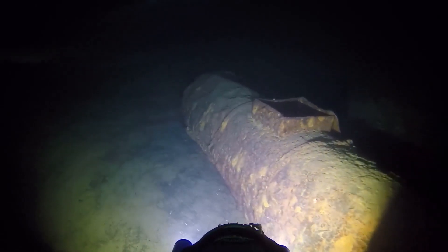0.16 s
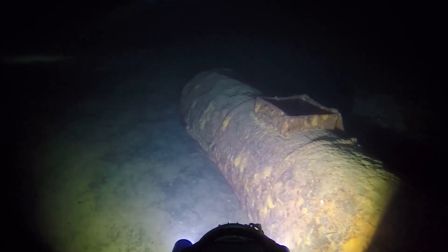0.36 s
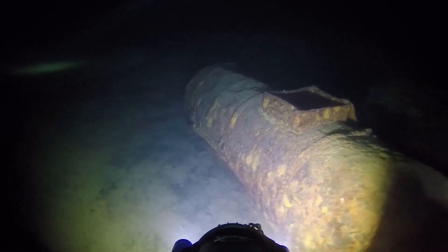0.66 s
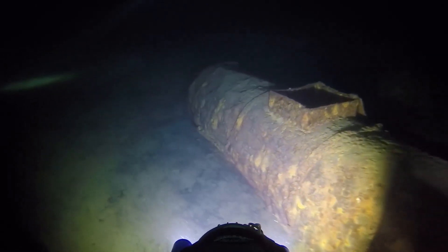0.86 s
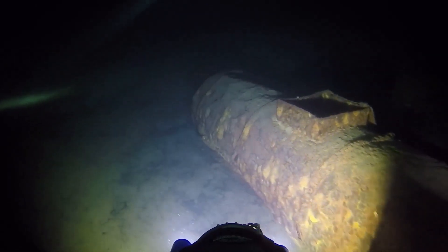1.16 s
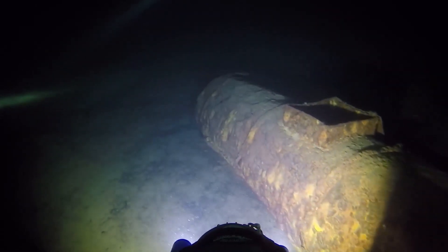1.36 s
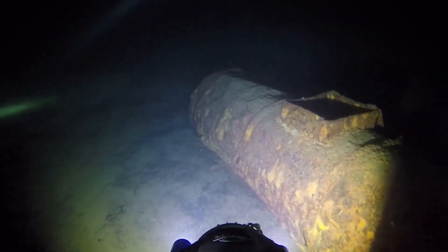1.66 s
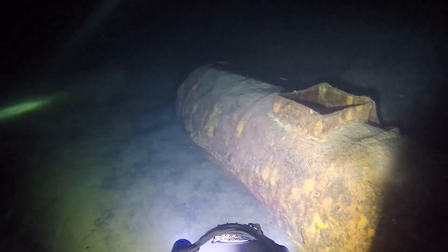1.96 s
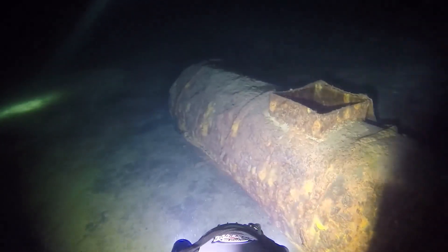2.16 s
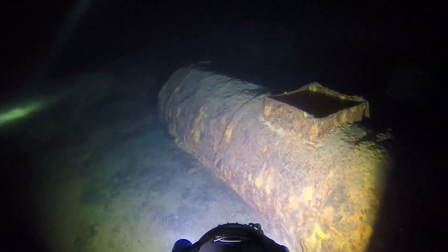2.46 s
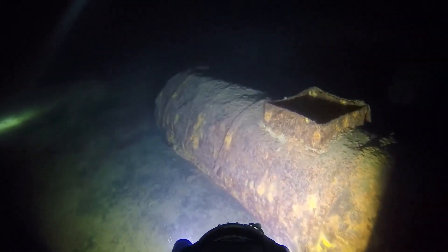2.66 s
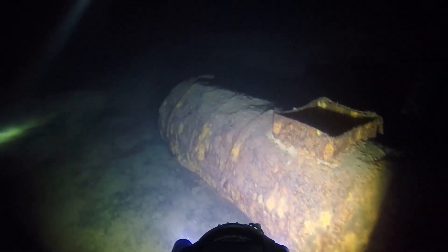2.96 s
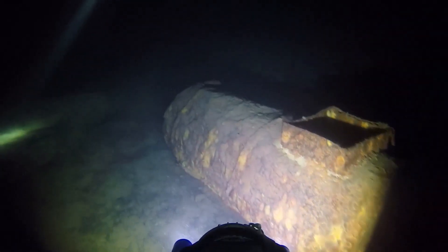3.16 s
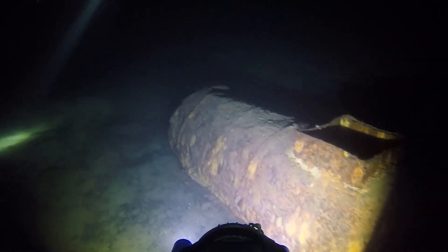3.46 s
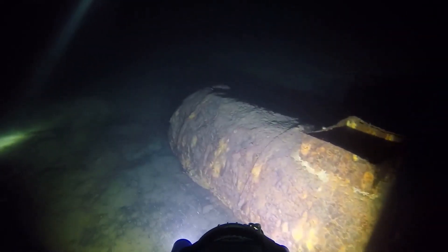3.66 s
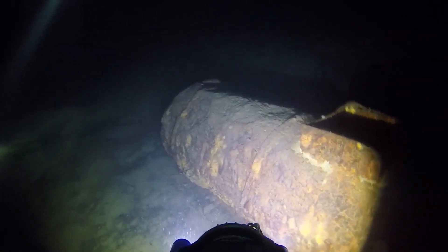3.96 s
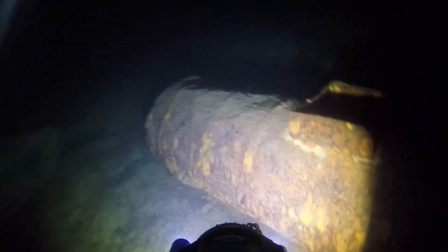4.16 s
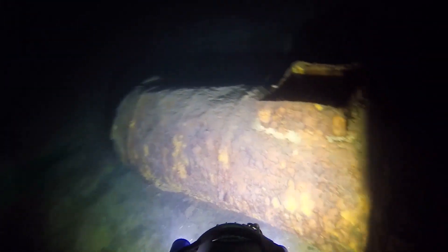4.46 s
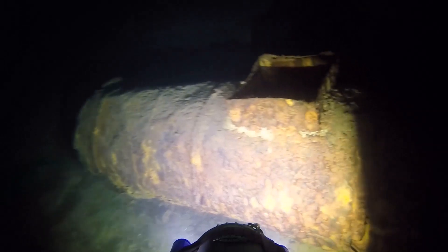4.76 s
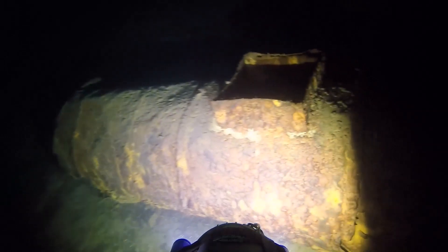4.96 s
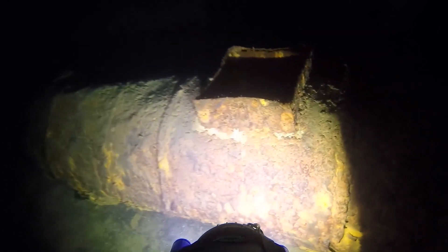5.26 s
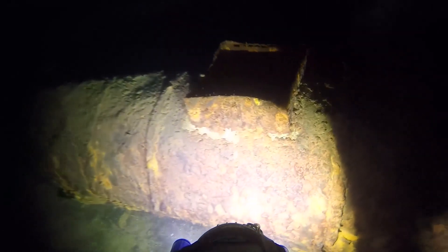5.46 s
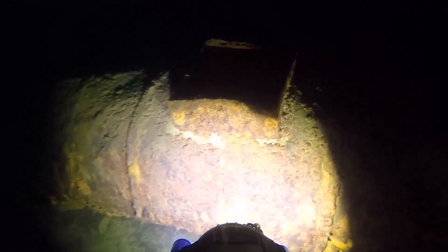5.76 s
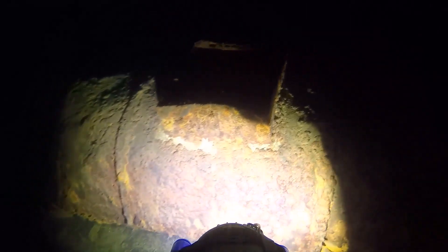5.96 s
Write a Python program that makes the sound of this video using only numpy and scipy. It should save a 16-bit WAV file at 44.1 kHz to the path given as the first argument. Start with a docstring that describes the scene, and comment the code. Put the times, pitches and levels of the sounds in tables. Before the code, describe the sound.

The sound is close, dry and enclosed, from one microphone inside a watertight housing underwater. Quiet constant hiss and very deep flow continue throughout, with a barely perceptible high whine fading after 2 s. Tiny ticks appear around 0.6-0.8 s, with a clearer crisp pair near 1.0 s. A faint rub swells around 1.4-1.5 s with a tick and a trace of sizzle; more ticks follow at 1.7 and 2.2 s, then two soft dull bumps at 2.3 s. At 2.88 s a very loud, hard knock cracks and rings briefly, with small bounces. From 3.17 to 3.4 s muffled knocks tumble over scraping, gritty grinding and low rumble. A tick comes at 3.7 s, a dull thud at 4.04 s, another tick at 4.12 s, then thin sizzle from 4.3 s. Short scrapes at 4.6-4.8 s lead to stronger rumbling rubs at 5.2-5.5 s, fading past small creaks at 5.6 and 5.8 s.

```python
"""Blows on the rig of a watertight camera housing in dark, still water: a sharp knock, softer ones and bounces.
Each rings the housing's modes, adds a noise crack and leaves a shudder; dull bumps are decaying sines.
A rubbing grip drives the same modes with random slips: scrape and rumble, with gritty grinding under two strokes.
Over it: modal ticks on the shell, creaks of the mount and grainy sizzles.
Behind it: filtered-noise flow rumble and hiss, and a faint whine of steady sines that fades."""
import sys
import numpy as np
from scipy import signal
from scipy.fft import rfft, irfft, next_fast_len
from scipy.io import wavfile
from scipy.ndimage import uniform_filter1d

SR = 44100
rng = np.random.default_rng(int(sys.argv[2]) if len(sys.argv) > 2 else 0)


def log_audio(samples):
    """Write samples as a 16-bit WAV file to the path given in sys.argv[1]."""
    # one column per channel
    frames = np.atleast_2d(samples).T
    # limit to full scale, then quantise
    limited = np.clip(frames, -1, 1)
    pcm = np.round(limited * 32767).astype(np.int16)
    wavfile.write(sys.argv[1], SR, pcm)


N = 269886
TIME_S = np.arange(N) / SR

# modes of housing and rig: [f/Hz, relative level/dB, t60/s]
HOUSING_MODES = [(34.4, -36.5, 0.43), (49.93, -18, 0.036), (74.7, -34.5, 0.4), (93.8, -20.5, 0.155),
                 (108.1, -32, 0.38), (127.1, -31, 0.23), (142.3, -28.5, 0.25), (185.5, -37, 0.34),
                 (264, -33.5, 0.24), (327.4, -32, 0.19), (379, -39, 0.2), (408, -38.5, 0.3),
                 (567, -28, 0.082), (643.8, -29, 0.21), (673, -28.5, 0.17), (757.4, -28.5, 0.18),
                 (772, -27.5, 0.12), (800, -21, 0.11), (849, -39, 0.27), (875, -14.5, 0.031),
                 (936, -22, 0.075), (957, -7, 0.014), (1047, -31, 0.11), (1134, -38.5, 0.16),
                 (1180, -33, 0.08), (1270, -24, 0.062), (1382, -35, 0.083), (1458, -26, 0.044),
                 (1481, -29, 0.018), (1612, -35.5, 0.061), (1707, -43, 0.053), (1895, -36, 0.045),
                 (2145, -32.5, 0.05), (2600, -29, 0.027), (2758, -27, 0.022), (2820, -31.5, 0.028),
                 (3200, -39, 0.03), (3630, -41.5, 0.022), (3840, -38, 0.025), (4570, -43.5, 0.025)]
# anti-resonances of the housing: [f/Hz, Q/1]
HOUSING_NOTCHES = [(218, 59), (475, 2.3), (712, 16), (2420, 6.9)]
# blows, bounces and jolts of the grip: [t/s, force/dB, contact bandwidth/Hz, low-mode lift/dB]
BLOWS = [(2.8785, 5, 6900, -3), (2.9038, -22, 4500, 0), (2.9405, -23, 2000, -4), (2.9681, -33, 890, 18),
         (3.1746, -29, 1400, 7), (3.2095, -21, 1310, 2.5), (3.222, -28, 1290, 12), (3.242, -26, 4200, -11),
         (3.2526, -15, 1510, -14), (3.266, -27, 1800, -14), (3.280, -23.5, 1900, -6),
         (3.298, -20.5, 1900, -20), (3.326, -25, 1600, 3.5), (3.362, -22, 1930, -21),
         (3.383, -25, 1900, -8), (4.039, -17.5, 1120, 6.5)]
# crack spectrum: [f/Hz, relative density/dB per Hz]
CRACK_SPECTRUM = [(2500, -7), (4000, -3), (4900, 3), (5500, 1.5), (6100, -1), (6900, -9.5), (8300, -9),
                  (9500, -17), (11000, -29.5), (15000, -42.5)]
# bumps of a gloved hand: [t/s, level before decay/dB, f/Hz]
HAND_BUMPS = [(2.2766, -50.5, 269), (2.2847, -46.5, 198)]
# grip strokes: [peak t/s, swell/s, hold/s, scrape fade/s, scrape level/dB, rumble level/dB,
#   scrape f/Hz, scrape lift/dB, rumble f/Hz, rumble lift/dB]
RUB_STROKES = [(1.387, 0.73, 0.097, 0.37, -69, -72.5, 756, 11.5, 111, 0),
               (1.53, 0.055, 0.01, 0.31, -71, -71, 734, 24, 109, -3),
               (3.082, 0.016, 0.025, 0.06, -63, -54, 940, 0, 122, 16.5),
               (3.231, 0.36, 0.06, 0.14, -51.5, -49, 957, 10.5, 123, 11.5),
               (3.376, 0.015, 0.0089, 0.43, -60.5, -67, 890, 17, 130, 13),
               (3.437, 0.017, 0.013, 0.067, -73, -52, 406, 8, 167.4, 9),
               (4.595, 1, 0.0092, 0.19, -68, -66.5, 869, 7.5, 133.5, 10.5),
               (4.769, 0.056, 0.035, 0.07, -61.5, -64.5, 850, 4.5, 232, 0),
               (4.828, 0.11, 0.024, 0.042, -52, -67, 1037, 11.5, 232, 2),
               (5.188, 0.23, 0.026, 0.077, -63, -58, 740, 10.5, 127.6, 12),
               (5.256, 0.19, 0.11, 0.058, -58.5, -54.5, 704, 4, 137.4, 17.5),
               (5.275, 0.19, 0.036, 0.063, -58.5, -60, 602, 17, 342, 19),
               (5.40, 0.05, 0.078, 0.17, -69.5, -63, 750, 12, 137, 17),
               (5.516, 0.04, 0.03, 0.66, -59.5, -59.5, 750, 9, 124.5, 30)]
# filter on the slips for the scrape: [f/Hz, relative gain/dB]
SCRAPE_FILTER = [(400, 7), (600, 10.5), (900, -4), (1350, 1), (1800, -2.5), (2850, -1.5), (3400, -8.5),
                 (4500, -19.5)]
# filter on the slips for the rumble: [f/Hz, relative gain/dB]
RUMBLE_FILTER = [(40, -36.5), (80, 0), (130, 5), (250, 0.5), (380, -8), (560, -20.5)]
# gritty grinding under two of the strokes: [peak t/s, swell/s, hold/s, fade/s, level/dB]
GRIND_STROKES = [(3.069, 0.03, 0.02, 0.06, -72), (3.23, 0.24, 0.059, 0.2, -61)]
# modes of the mount, undamped by the grip: [f/Hz, relative level/dB, t60/s]
MOUNT_MODES = [(1743, -4, 0.16), (1990, 3.5, 0.043), (2575, -9, 0.053), (2780, 4.5, 0.042),
               (2830, -20, 0.03)]
# treble modes of the shell: [f/Hz, relative level/dB, t60/s]
SHELL_MODES = [(3140, -12, 0.02), (3830, -9.5, 0.025), (4260, -10, 0.017), (4700, -11, 0.014),
               (5070, -7.5, 0.014), (5460, -8, 0.023), (5900, -9, 0.016), (6560, -6, 0.017),
               (8600, -7, 0.011), (10040, -1.5, 0.0079), (12170, -22, 0.011)]
# ticks on the shell: [t/s, peak of the ringing/dB, centre f/Hz, spread/octaves]
SHELL_TICKS = [(0.626, -57, 5900, 0.16), (0.666, -59, 5430, 0.22), (.805, -61, 6300, .2),
               (0.9584, -36.5, 4930, 0.51), (0.9983, -44.5, 7200, 1.4), (1.478, -48, 5060, 0.6),
               (1.715, -53.5, 5600, 0.13), (2.184, -52.5, 9100, 0.43), (2.928, -49, 7950, 1.2),
               (3.7215, -47.5, 7600, 0.19), (4.122, -46.5, 9850, 0.57), (5.005, -52.5, 6040, 0.6)]
# bare contact of a tick: [f/Hz, relative density/dB per Hz]
SNAP_SPECTRUM = [(1000, -17.5), (2500, -2.5), (3800, -9), (6700, 1.5), (7300, -17.5), (10500, -13.5),
                 (14000, -33)]
# creaks of the mount: [t/s, peak level/dB]
MOUNT_CREAKS = [(5.622, -48), (5.788, -53)]
# spells of thin hiss: [start t/s, hold/s, level/dB]
SIZZLE_SPELLS = [(1.257, 0.077, -74), (4.285, 0.42, -69), (5.307, 0.36, -77)]
# sizzle spectrum: [f/Hz, relative density/dB per Hz]
SIZZLE_SPECTRUM = [(2500, -14), (4500, 5.5), (6000, -2), (7050, 1.5), (7500, 10), (8100, -5.5), (10500, -4),
                   (14000, -29)]
# water flowing past the housing: [f/Hz, relative density/dB per Hz]
FLOW_SPECTRUM = [(8, -41.5), (18, -9.5), (29, 2.5), (40, -11.5), (55, -15), (110, -23), (170, -30.5),
                 (300, -34.5), (700, -39.5)]
# recorder hiss: [f/Hz, relative density/dB per Hz]
HISS_SPECTRUM = [(100, 8), (480, 2.5), (750, 1.5), (1200, 2), (2300, 0), (2850, 0.5), (3300, -2),
                 (4300, 0.5), (5250, 0.5), (6200, -5), (7700, -7), (10000, -9), (12000, -10.5),
                 (15000, -12)]
# electronics whine before its fade: [f/Hz, rms level/dB]
WHINE_LINES = [(12462, -97), (12543, -96), (12715, -95)]
# fade of the whine: [t/s, gain/dB]
WHINE_FADE = [(0, 0), (2.0, 0), (2.8, -6), (6.1, -10)]

LOW_MODE_LAG = 0.9  # swell time of a mode goes as its period to this power
THUMP_BELOW_HZ = 540
CRACK_DB, CRACK_RISE_S, CRACK_DECAY_S, CRACK_LEAD_S = -36.5, 0.0007, 0.0015, 0.0008  # dB re force
BUMP_T60_S = 0.041
SHUDDER_DB, SHUDDER_DB_PER_S, SHUDDER_HZ, SHUDDER_LIFT_DB = -34, 140.5, 115, 5.5  # level re force
RATTLE_DB, RATTLE_DB_PER_S, SHUDDER_ONSET_S = -52.5, 185, 0.0041  # level re force
SLIPS_PER_S, SLIP_SPREAD_DB = 900, 3
STROKE_RANGE_DB = 29  # rise over one swell time, drop over one fade time
SWELL_CURVE, FADE_CURVE = 0.7, 0.6  # powers of time in the dB slopes
RUMBLE_FADE_S, RUMBLE_FADE_CURVE = 0.23, 0.74
CATCH_S, CATCH_SPREAD_DB = 0.0092, 1.5
GRIT_PER_S, GRIT_DAMPING_S = 280, 0.0039
SNAP_DB, SNAP_DECAY_S = -14, 0.0016  # rms before decay, re peak of the ringing
CREAK_SLIP_S, CREAK_LOSS_DB = 0.0042, 6  # spacing and loss per slip
SIZZLE_ATTACK_S, SIZZLE_RELEASE_S, SIZZLE_GRAINS_PER_S = 0.0066, 0.24, 3100
CUTOFF_HZ = 15350


def from_db(db):
    """Decibels to gain."""
    return 10 ** (np.asarray(db) / 20)


def rms_one(x):
    """Scale to rms 1."""
    return x / np.sqrt(np.mean(x ** 2) + 1e-20)


def t60_decay(t, t60_s):
    """Exponential decay by 60 dB in t60_s."""
    return np.exp(-np.log(1000) * t / t60_s)


def coloured(x, spectrum):
    """Filter by a [f/Hz, dB] table, 20 dB per octave down outside it; rms 1."""
    hz, db = np.transpose(spectrum)
    size = next_fast_len(len(x))
    bins_hz = np.maximum(np.fft.rfftfreq(size, 1 / SR), 1)
    octaves_above = np.maximum(np.log2(bins_hz / hz[-1]), 0)
    octaves_below = np.maximum(np.log2(hz[0] / bins_hz), 0)
    curve_db = np.interp(np.log(bins_hz), np.log(hz), db)
    gain = from_db(curve_db - 20 * (octaves_above + octaves_below))
    return rms_one(irfft(rfft(x, size) * gain, size)[:len(x)])


def emphasised(x, hz, lift_db, q):
    """Lift one narrow band."""
    return x + (from_db(lift_db) - 1) * signal.lfilter(*signal.iirpeak(hz, q, fs=SR), x)


def steady(x, window_s):
    """Even out slow level swings; rms about 1."""
    power = uniform_filter1d(x ** 2, int(window_s * SR))
    return x / np.sqrt(np.maximum(power, 1e-9))


def add(out, t_s, sound):
    """Mix a sound in at t_s."""
    start = round(t_s * SR)
    out[start:start + len(sound)] += sound[:N - start]


def ringing(modes, swell_at_1khz_s, polarity=1):
    """Response to one tap: modes swell, low ones slower, then decay; polarity -1 alternates signs."""
    t = TIME_S[:SR // 2]
    hz, db, t60_s = np.transpose(modes)[:, :, None]
    swell = 1 - np.exp(-(t * (hz / 1000) ** LOW_MODE_LAG / swell_at_1khz_s) ** 2)
    signs = polarity ** np.arange(len(modes))[:, None]
    partials = signs * from_db(db) * swell * t60_decay(t, t60_s) * np.sin(2 * np.pi * hz * t)
    return np.sum(partials, axis=0)


def housing():
    """Modal response of the housing to one tap, notched at its anti-resonances."""
    body = ringing(HOUSING_MODES, swell_at_1khz_s=0.0014)
    for hz, q in HOUSING_NOTCHES:
        body = signal.lfilter(*signal.iirnotch(hz, q, fs=SR), body)
    return body


def crack():
    """Noise burst of one contact."""
    t = TIME_S[:SR // 10]
    envelope = (1 - np.exp(-t / CRACK_RISE_S)) * np.exp(-t / CRACK_DECAY_S)
    return coloured(rng.standard_normal(len(t)), CRACK_SPECTRUM) * envelope


def knocks(body):
    """Contact bandwidth limits the modes woken, weight lifts the low ones, force scales modes and crack."""
    out = np.zeros(N)
    bass = signal.sosfilt(signal.butter(1, THUMP_BELOW_HZ, fs=SR, output="sos"), body)
    for t_s, force_db, contact_hz, thump_db in BLOWS:
        contact = signal.butter(3, contact_hz, fs=SR, output="sos")
        weighted = body + (from_db(thump_db) - 1) * bass
        add(out, t_s, from_db(force_db) * signal.sosfilt(contact, weighted))
        add(out, t_s - CRACK_LEAD_S, from_db(force_db + CRACK_DB) * crack())
    return out


def after_blows(db_per_s):
    """Gain of a shaking fed by each blow's force, decaying at db_per_s; energies add."""
    energy, t = np.zeros(N), TIME_S[:SR]
    for t_s, force_db, *_ in BLOWS:
        onset = 1 - np.exp(-t / SHUDDER_ONSET_S)
        add(energy, t_s, (from_db(force_db - db_per_s * t) * onset) ** 2)
    return np.sqrt(energy)


def shudder(scraping, rumbling):
    """After a blow the rig's joints rattle briefly and it rumbles a little longer."""
    rattle = steady(scraping, window_s=0.14)
    rumble = steady(emphasised(rumbling, SHUDDER_HZ, SHUDDER_LIFT_DB, q=5.1), window_s=0.18)
    rattle_part = from_db(RATTLE_DB) * after_blows(RATTLE_DB_PER_S) * rattle
    rumble_part = from_db(SHUDDER_DB) * after_blows(SHUDDER_DB_PER_S) * rumble
    return rattle_part + rumble_part


def bumps():
    """A damping gloved hand: a few dull cycles per bump."""
    out, t = np.zeros(N), TIME_S[:SR // 5]
    for t_s, level_db, hz in HAND_BUMPS:
        add(out, t_s, from_db(level_db) * np.sin(2 * np.pi * hz * t) * t60_decay(t, BUMP_T60_S))
    return out


def slips(per_s, spread_db):
    """Stick-slip: impulses of uneven size and random sign at random moments."""
    sizes = from_db(spread_db * np.minimum(rng.exponential(1, N), 4)) * rng.choice([-1, 1], N)
    return sizes * (rng.random(N) < per_s / SR)


def friction(body):
    """Slips ring the housing; filtered into a mid scrape and a low rumble."""
    pushes = slips(SLIPS_PER_S, SLIP_SPREAD_DB)
    ringing_part = rms_one(signal.fftconvolve(pushes, body)[:N])
    # direct share of each slip, dulled by the wall
    direct_part = rms_one(signal.sosfilt(signal.butter(3, 1100, fs=SR, output="sos"), pushes))
    shaken = ringing_part + from_db(-9.5) * direct_part
    return coloured(shaken, SCRAPE_FILTER), coloured(shaken, RUMBLE_FILTER)


def stroke(peak_s, swell_s, hold_s, fade_s, fade_curve):
    """Gain that swells to 1 at the peak, holds and fades."""
    before = np.clip((peak_s - TIME_S) / swell_s, 0, 4) ** SWELL_CURVE
    after = np.clip((TIME_S - peak_s - hold_s) / fade_s, 0, 4) ** fade_curve
    return from_db(-STROKE_RANGE_DB * (before + after))


def catches():
    """Uneven gain of a grip that catches and eases; rms 1."""
    moments_s = np.arange(0, TIME_S[-1], CATCH_S)
    strength = np.interp(TIME_S, moments_s, rng.standard_normal(len(moments_s)))
    return rms_one(from_db(CATCH_SPREAD_DB * strength))


def rubbing(scraping, rumbling):
    """Each stroke favours one scrape and one rumble pitch; the rumble has its own fade."""
    out, grip = np.zeros(N), catches()
    for (peak_s, swell_s, hold_s, fade_s, scrape_db, rumble_db,
         scrape_hz, scrape_lift_db, rumble_hz, rumble_lift_db) in RUB_STROKES:
        scrape = steady(emphasised(scraping, scrape_hz, scrape_lift_db, q=8.2), window_s=0.03)
        rumble = steady(emphasised(rumbling, rumble_hz, rumble_lift_db, q=20), window_s=0.14)
        scrape_gain = stroke(peak_s, swell_s, hold_s, fade_s, FADE_CURVE) * grip
        rumble_gain = stroke(peak_s, swell_s, hold_s, RUMBLE_FADE_S, RUMBLE_FADE_CURVE)
        out += from_db(scrape_db) * scrape_gain * scrape
        out += from_db(rumble_db) * rumble_gain * rumble
    return out


def grinding():
    """Sparse gritty slips in the mount, its modes damped by the grip."""
    damping = np.exp(-TIME_S[:SR // 2] / GRIT_DAMPING_S)
    damped = ringing(MOUNT_MODES, swell_at_1khz_s=0.00025) * damping
    grit = rms_one(signal.fftconvolve(slips(GRIT_PER_S, spread_db=1), damped)[:N])
    gain = np.zeros(N)
    for peak_s, swell_s, hold_s, fade_s, level_db in GRIND_STROKES:
        gain += from_db(level_db) * stroke(peak_s, swell_s, hold_s, fade_s, FADE_CURVE)
    return grit * gain


def ticks():
    """A tap with a noise tail rings the shell modes around a centre; a bare snap is added."""
    out = np.zeros(N)
    hz, db, t60_s = np.transpose(SHELL_MODES)
    tail_t, snap_t = TIME_S[:SR // 10], TIME_S[:SR // 20]
    for t_s, peak_db, centre_hz, octaves in SHELL_TICKS:
        tint_db = -4.3 * (np.log2(hz / centre_hz) / octaves) ** 2
        modes = np.column_stack([hz, db + tint_db, t60_s])
        force = 0.18 * rng.standard_normal(len(tail_t)) * t60_decay(tail_t, 0.011)
        force[0] = 1
        tick = signal.fftconvolve(force, ringing(modes, swell_at_1khz_s=0.0002, polarity=-1))
        add(out, t_s, from_db(peak_db) * tick / np.abs(tick).max())
        snap_noise = coloured(rng.standard_normal(len(snap_t)), SNAP_SPECTRUM)
        add(out, t_s, from_db(peak_db + SNAP_DB) * snap_noise * np.exp(-snap_t / SNAP_DECAY_S))
    return out


def creaks():
    """Four quick slips, each weaker, ring the mount."""
    out, ring = np.zeros(N), ringing(MOUNT_MODES, swell_at_1khz_s=0.0014)
    for t_s, peak_db in MOUNT_CREAKS:
        creak = np.zeros(N)
        for k, jitter in enumerate(rng.uniform(0, 0.5, size=4)):
            add(creak, t_s + CREAK_SLIP_S * (k + jitter), from_db(-CREAK_LOSS_DB * k) * ring)
        out += from_db(peak_db) * creak / np.abs(creak).max()
    return out


def sizzle():
    """Filtered random grains: a thin hiss sets in quickly, holds and dies away."""
    gain = np.zeros(N)
    for start_s, hold_s, level_db in SIZZLE_SPELLS:
        early_s = np.maximum(start_s - TIME_S, 0)
        late_s = np.maximum(TIME_S - start_s - hold_s, 0)
        gain += from_db(level_db) * np.exp(-early_s / SIZZLE_ATTACK_S - late_s / SIZZLE_RELEASE_S)
    return gain * coloured(slips(SIZZLE_GRAINS_PER_S, spread_db=4), SIZZLE_SPECTRUM)


def flow():
    """Water passing the housing: steadied deep noise."""
    return from_db(-57) * steady(coloured(rng.standard_normal(N), FLOW_SPECTRUM), window_s=0.23)


def recorder_noise():
    """Filtered-noise hiss and a fading whine of sines."""
    hiss = from_db(-66.5) * coloured(rng.standard_normal(N), HISS_SPECTRUM)
    whine = np.zeros(N)
    for hz, rms_db in WHINE_LINES:
        whine += np.sqrt(2) * from_db(rms_db) * np.sin(2 * np.pi * hz * TIME_S)
    return hiss + whine * from_db(np.interp(TIME_S, *np.transpose(WHINE_FADE)))


def scene():
    """Sum of all sources at one microphone inside the housing."""
    body = housing()
    scraping, rumbling = friction(body)
    blows = knocks(body) + shudder(scraping, rumbling) + bumps()
    grip = rubbing(scraping, rumbling) + grinding()
    details = ticks() + creaks() + sizzle()
    return (blows + grip + details + flow() + recorder_noise())[None]


def record(dry):
    """Steep elliptic low-pass cuts the top."""
    return signal.sosfilt(signal.ellip(12, 0.1, 70, CUTOFF_HZ, fs=SR, output="sos"), dry)


dry = scene()
out = record(dry)
log_audio(out)
```